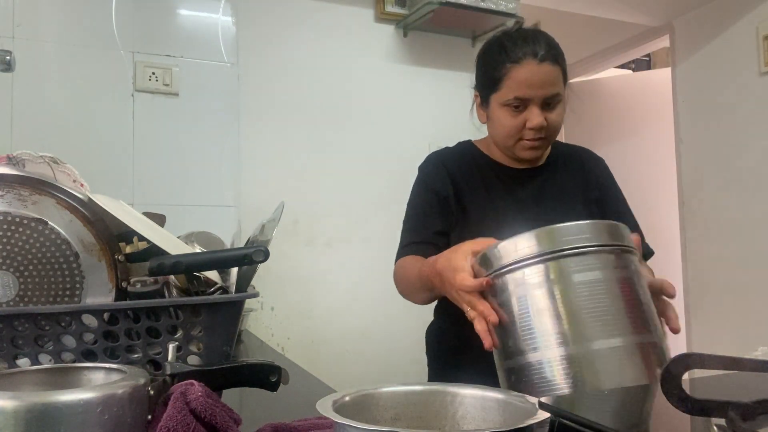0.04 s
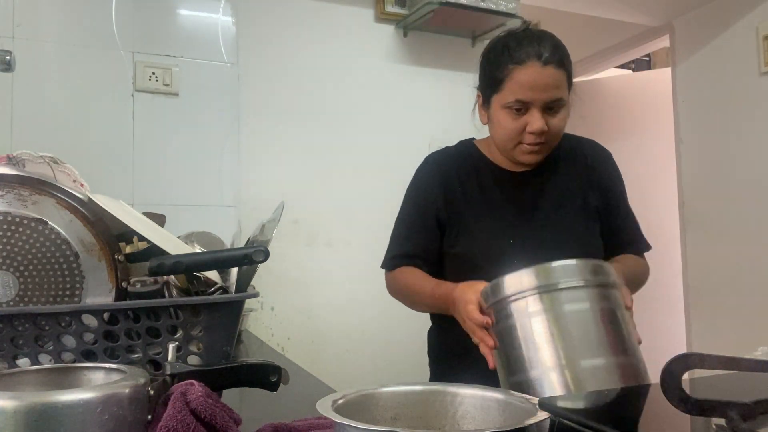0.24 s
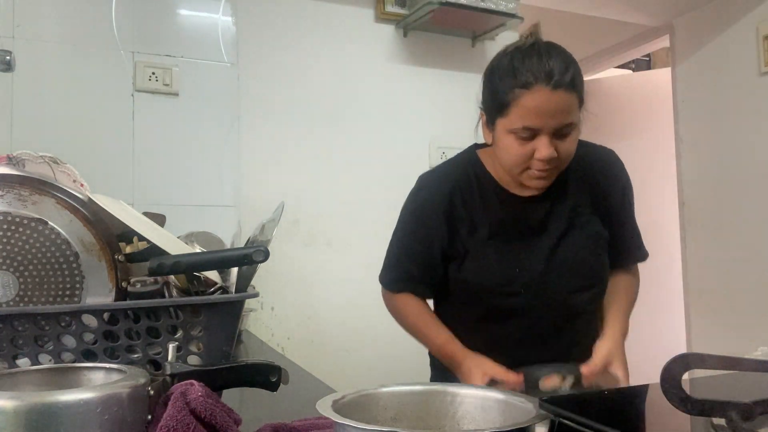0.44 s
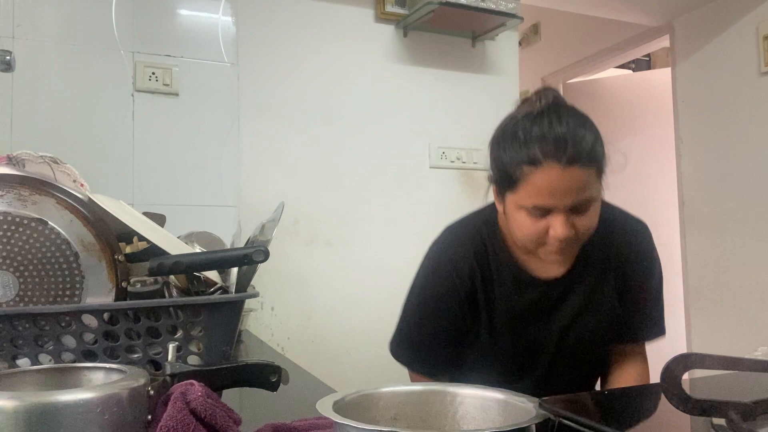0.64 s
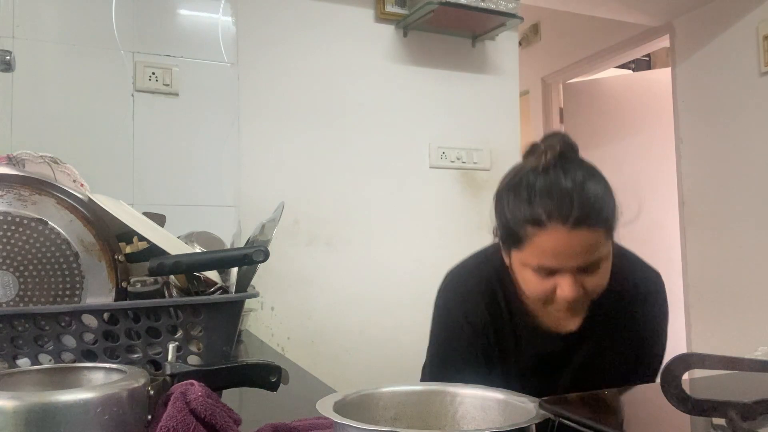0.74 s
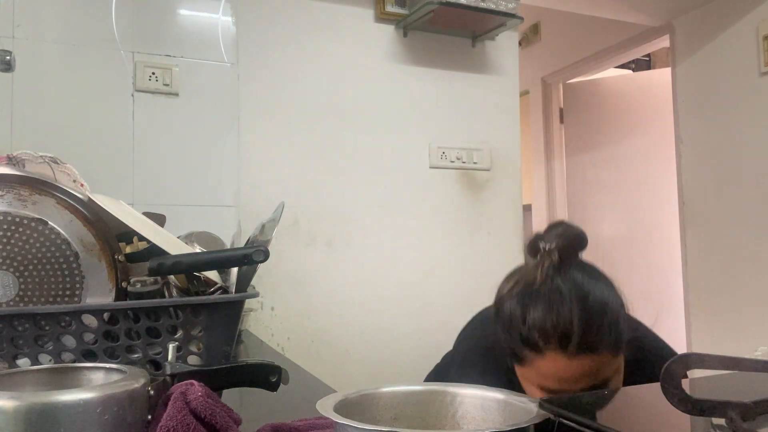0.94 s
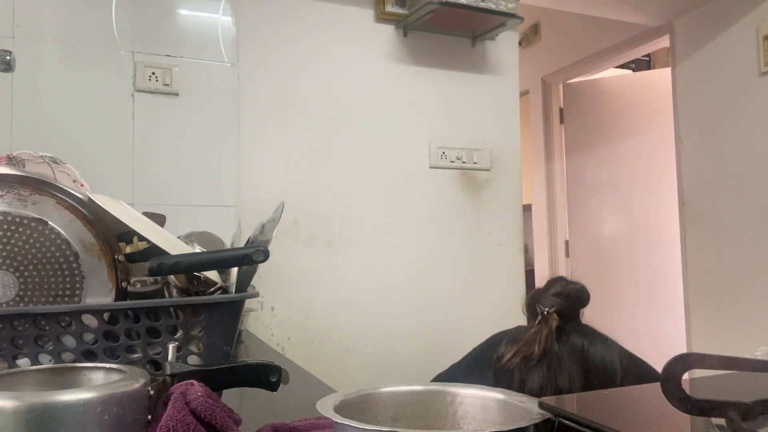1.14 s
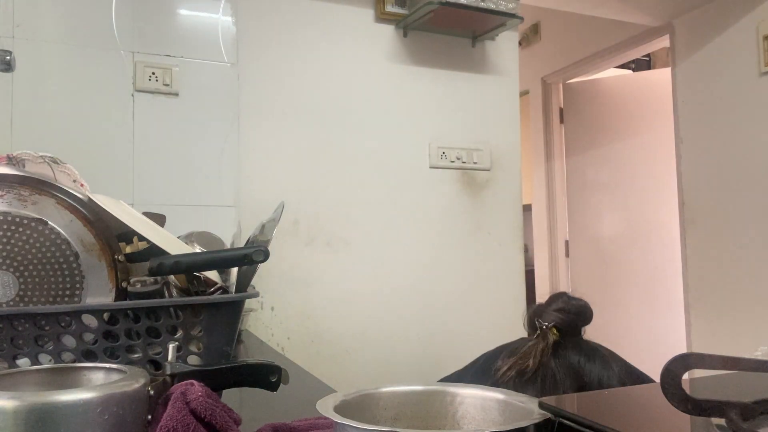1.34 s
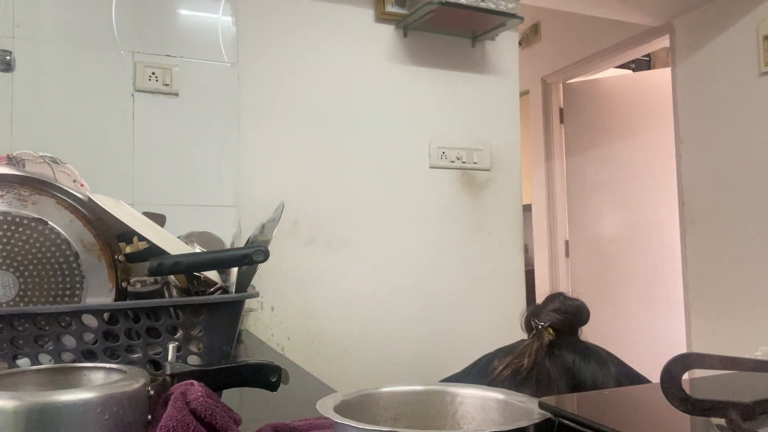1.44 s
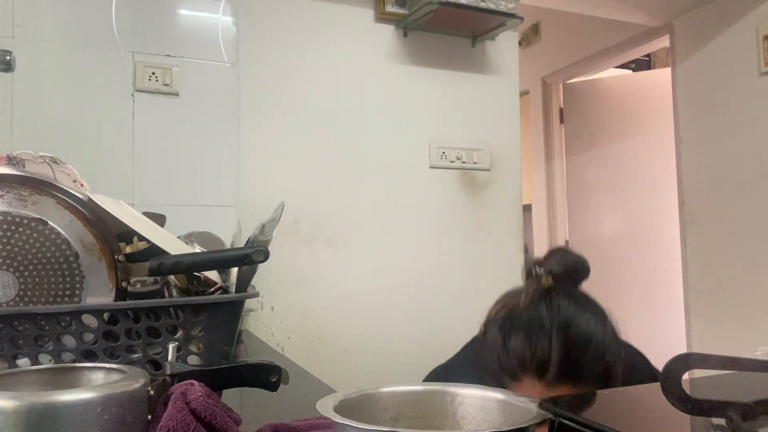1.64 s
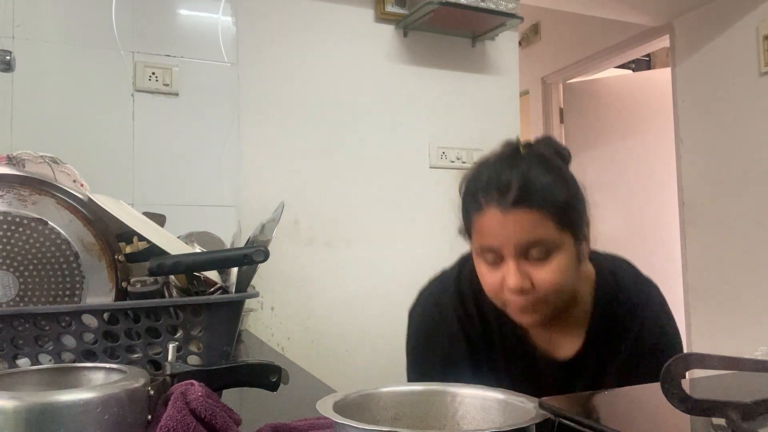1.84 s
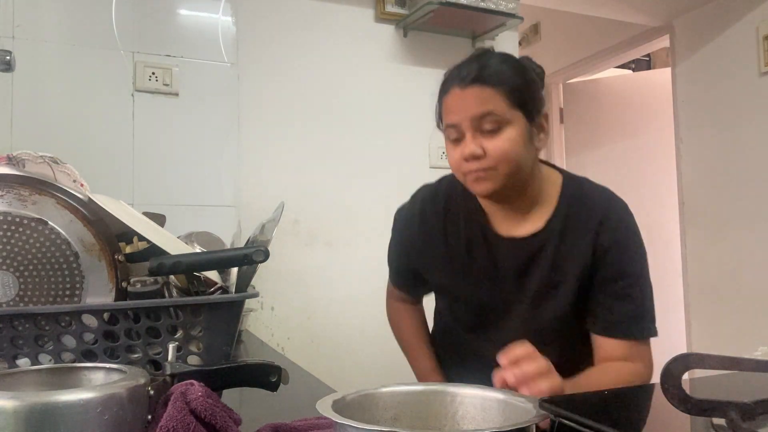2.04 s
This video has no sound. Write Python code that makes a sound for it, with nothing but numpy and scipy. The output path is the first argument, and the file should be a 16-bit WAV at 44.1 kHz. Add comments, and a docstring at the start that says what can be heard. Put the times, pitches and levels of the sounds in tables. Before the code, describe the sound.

Hollow lid bumps and soft sliding on a big steel tin, then a heavy boom with clattering metal, a brief scrape and two separate dull knocks, heard through room reflections at some distance from the microphone.

```python
"""Hollow bumps as a lid is pressed onto a large steel storage tin, over soft sliding, in a hard-walled kitchen.
The tin is then set down with a boom and a clatter of loose steel, and two more hollow knocks follow below
the counter. Bumps and boom are low decaying sine modes, struck steel is higher wavering modes, and clacks,
clanks, sliding and background are coloured noise. Nearly all of the sound arrives by way of the room."""
import sys
import numpy as np
from scipy import signal
from scipy.fft import irfft
from scipy.io import wavfile
from scipy.ndimage import uniform_filter1d

SR = 44100
rng = np.random.default_rng(int(sys.argv[2]) if len(sys.argv) > 2 else 0)


def pcm_store(signal):
    """Save signal as 16-bit PCM."""
    levels = np.round(np.clip(np.atleast_2d(signal), -1, 1) * 32767)
    wavfile.write(sys.argv[1], SR, levels.astype(np.int16).T)


N = 92610
T = np.arange(N) / SR
HZ = np.fft.rfftfreq(N, 1 / SR)

# how alike left and right are: (frequency [Hz], shared part [0 to 1])
LIKENESS = [(150, 1), (320, 0.84), (500, 0.26), (750, 0.35), (1500, 0.1), (5500, 0.13), (7800, 1)]
# how far the left lags the right: (frequency [Hz], phase [rad])
LEFT_LAG = [(60, -0.01), (350, 0.68), (700, 2.5), (6000, -1.7), (8200, 0.59), (10500, 2.5), (13300, 8),
            (15000, 8)]
# modes of each steel part, by part name: (frequency [Hz], relative level [dB])
STEEL_MODES = { "top": [(445, -16), (565, 0), (667, 5.5), (963, -4.5), (1577, -4)], "wall": [(538, 5.5),
               (719, -5), (904, -1.5), (1055, 3.5), (1260, -5), (1345, -5), (2761, -15), (4547, -2),
               (5571, -10)], "lid": [(2320, 6.5), (3284, -3.5), (3940, -2), (6730, -2), (7200, -0.5),
               (8420, 1.5)], "base": [(544, 2), (730, -2), (795, 1), (990, -3), (1100, -9.5),
               (2420, -11.5)], "pot": [(533, 3), (1023, -1), (1281, -2), (2562, -8)], "rim": [(657, 5),
               (1136, -2), (1486, -8.5), (1970, -5.5), (2660, -9)], "flank": [(452, 2), (538, 1.5),
               (678, -1), (1410, -7), (1669, -13)]}

BODY_SCATTER, SCATTER_HZ = 0.25, 55  # waver depth of low modes (ratio), waver rate of every mode (Hz)


def amp(db):
    """Decibels to gain."""
    return 10 ** (np.asarray(db) / 20)


def unit(x):
    """Scales to rms 1."""
    return x / np.sqrt(np.mean(x ** 2) + 1e-20)


def read(points, hz):
    """Reads a table on a log-frequency axis."""
    f, value = np.transpose(points)
    return np.interp(np.log(hz + 1), np.log(f), value)


def add(mix, s, sound):
    """Mixes a stereo sound in at time s."""
    part = mix[:, max(round(s * SR), 0):]
    part += sound[:, :part.shape[1]]


def dying(t, t60):
    """Exponential decay, 60 dB in t60."""
    return np.exp(-np.log(1000) * t / t60)


def at_left(right, other, hz):
    """Left signal: the part shared with the right plus an unrelated part."""
    same = np.clip(read(LIKENESS, hz), 0, 1)
    return same * right + np.sqrt(1 - same ** 2) * other


def left_delay(hz):
    """Phase turn by which the left lags the right."""
    return np.exp(-1j * read(LEFT_LAG, hz))


def diffuse(colour_db, tilt_db=0):
    """Coloured stereo noise at rms 1, left and right partly alike by frequency."""
    right, other = np.exp(2j * np.pi * rng.random((2, len(HZ))))
    left = at_left(right, other, HZ) * left_delay(HZ)
    octaves = np.log2(np.maximum(HZ, 500) / 500)  # the tilt acts above 500 Hz only
    return unit(irfft(np.array([left, right]) * amp(colour_db + tilt_db * octaves), N))


def ripple():
    """Fine, irregular spectral peaks and dips of sheet steel's countless weaker modes, in dB."""
    depth_db, spacing_hz = 3.5, 44.75
    knots = rng.standard_normal(4096)
    return depth_db * np.interp(HZ / spacing_hz, np.arange(len(knots)), knots)


def resonances(modes):
    """Spectrum in dB of a set of narrow steel resonances that widen with frequency."""
    width_hz, width_share = 21, 0.011
    power = 1e-12
    for hz, db in modes:
        detune = (HZ - hz) / (width_hz + width_share * hz)
        power = power + amp(db) ** 2 / (1 + detune ** 2) ** 2
    return 10 * np.log10(power)


def onset():
    """A weak direct sound, then the quick build-up of reflections."""
    direct_db, build_s = -8, 0.008
    return 1 - (1 - amp(direct_db)) * np.exp(-T / build_s)


def burst(colour_db, tilt_db, t60s, tail_db):
    """A blow smeared by the room: quick swell, decay by band, then a weaker, slower tail."""
    tail_stretch = 2.1  # the tail's t60 relative to the main decay
    hz, t, z = signal.stft(diffuse(colour_db, tilt_db), SR, nperseg=256)
    fall_db = -60 * t / read(t60s, hz)[:, None]
    z = z * np.hypot(amp(fall_db), amp(tail_db + fall_db / tail_stretch))
    return signal.istft(z, SR, nperseg=256)[1][:, :N] * onset()


def mode(hz, scatter):
    """One ringing mode in stereo, wavering as its reflections overlap."""
    knots = rng.standard_normal((2, 512, 2)) @ [1, 1j] / np.sqrt(2)
    right, other = (np.interp(T * SCATTER_HZ, np.arange(len(k)), k) for k in knots)
    left_waver = (1 + scatter * at_left(right, other, hz)) * left_delay(hz)
    waver = np.array([left_waver, 1 + scatter * right])
    return (waver * np.exp(2j * np.pi * hz * T)).imag / np.hypot(1, scatter)


def bumps(events, modes):
    """Each bump swells a hollow body's low modes and adds a short noisy clack."""
    # spectrum of the clack: (frequency [Hz], relative level [dB per Hz])
    clack_points = [(40, -36), (130, 0), (330, 2.5), (480, -3), (680, -1), (950, -8.5), (1900, -13.5),
                    (3800, -24.5), (6000, -26.5), (8200, -23), (10000, -35), (15000, -34.5)]
    # decay of the clack: (frequency [Hz], t60 [s])
    clack_t60s = [(150, 0.86), (700, 0.46), (2500, 0.67), (8000, 0.43), (15000, 0.37)]
    rise_s, clack_tail_db = 0.0081, -26
    tail_db, tail_t60 = -29.5, 1.48  # the body's faint lingering in the room (dB, s)
    pan = amp([[-0.76], [0.76]])  # body leans right (dB at left, right)

    out = np.zeros((2, N))
    swell = 1 - np.exp(-(T / rise_s) ** 2)
    tail = amp(tail_db) * dying(T, tail_t60)
    colour = read(clack_points, HZ) + ripple()
    for s, body_db, pitch, clack_db, tilt_db in events:
        body = np.zeros((2, N))
        for hz, db, t60 in modes:
            body += amp(db) * mode(hz * pitch, BODY_SCATTER) * (dying(T, t60) + tail)
        clack = burst(colour, tilt_db, clack_t60s, clack_tail_db)
        add(out, s, 2 * amp(body_db) * swell * body * pan + amp(clack_db) * clack)
    return out


def room_background():
    """Steady low room noise, strongest around 60 to 105 Hz."""
    # spectrum of the background: (frequency [Hz], relative level [dB per Hz])
    air_points = [(20, -34), (42, -6.5), (62, 4.5), (80, -4), (105, 6.5), (200, -5.5), (300, -7.5),
                  (500, -13.5), (1000, -19.5), (2500, -31.5), (5000, -65)]
    level_db = -41.5
    return amp(level_db) * diffuse(read(air_points, HZ))


def rubbing():
    """Hands and steel slide over steel: a grainy rasp, a thin hiss, and the tin's ringing scrape."""
    # sliding and rubbing: (time [s], rasp level [dB], hiss level [dB])
    rub_levels = [(0, -55.5, -58.5), (.1, -53.5, -56.5), (.17, -50.5, -51), (.23, -49, -47),
                  (.32, -80, -94), (.38, -61, -61.5), (.44, -59, -54.5), (.5, -46.5, -56), (.9, -46.5, -59),
                  (1.15, -57.5, -87), (1.42, -61.5, -66.5), (1.58, -58.5, -60), (1.8, -61, -69),
                  (1.92, -49, -64.5), (2.03, -54.5, -59.5), (2.1, -63, -72.5)]
    # spectrum of the rasp: (frequency [Hz], relative level [dB per Hz])
    rasp_points = [(200, 4), (700, -6), (1400, 3), (2600, 3.5), (4200, 0.5), (6500, -7.5), (15000, -22.5)]
    # spectrum of the hiss: (frequency [Hz], relative level [dB per Hz])
    hiss_points = [(1000, -43), (4000, -10.5), (8200, -2), (10000, -9.5), (15000, -7.5)]
    # the tin's base scrapes along as it is pushed into place: (time [s], level [dB])
    scrape_levels = [(.7, -78), (.77, -39), (.83, -44), (.91, -41), (.96, -47), (1.035, -45.5), (1.1, -61)]
    grain_db, grain_s = 1.5, 0.0013  # rms level flutter, smoothing time

    flutter = unit(uniform_filter1d(rng.standard_normal(N), int(grain_s * SR)))
    grain = unit(amp(grain_db * flutter))
    s, rasp_db, hiss_db = np.transpose(rub_levels)
    rasp = amp(np.interp(T, s, rasp_db)) * diffuse(read(rasp_points, HZ) + ripple())
    hiss = amp(np.interp(T, s, hiss_db)) * diffuse(read(hiss_points, HZ) + ripple())
    # silent before and after the scrape
    scrape_db = np.interp(T, *np.transpose(scrape_levels), left=-np.inf, right=-np.inf)
    scrape = amp(scrape_db) * diffuse(resonances(STEEL_MODES["base"]))
    return grain * (rasp + hiss + scrape)


def lid_presses():
    """Pressing the lid on bumps the lid's low modes over the closed tin."""
    # bumps: (time [s], relative body level [dB], pitch [ratio], clack level [dB],
    #         clack brightness [dB per octave])
    presses = [(.002, -33, 0.78, -39, -2), (.066, -28, 0.94, -48, 0), (.093, -25.5, 0.96, -50, 2),
               (.119, -28, 0.86, -37, -2.5), (.193, -19, 0.94, -34.5, -1), (.213, -19, 0.98, -40, 1.5),
               (.328, -36, 0.91, -69, 4)]
    # modes of the lid over the tin, before the pitch ratio: (frequency [Hz], relative level [dB], t60 [s])
    lid_modes = [(142.7, -15, 0.29), (171.5, -15, 0.31), (202.5, 0.5, 0.15), (265.1, -1, 0.22),
                 (351, -19.5, 0.33), (450, -20.5, 0.2)]
    return bumps(presses, lid_modes)


def rings():
    """Struck steel parts swell quickly and die away, their high modes first."""
    # parts set ringing: (time [s], level of the whole part [dB], t60 at 1 kHz [s], part [name])
    ring_events = [(.195, -32, 0.47, "top"), (.487, -25.5, 0.58, "wall"), (.528, -25.5, 0.66, "wall"),
                   (.637, -28, 0.4, "lid"), (.7, -36, 0.46, "lid"), (.854, -28, 0.13, "base"),
                   (1.222, -44.5, 0.99, "pot"), (1.282, -28, 0.27, "rim"), (1.638, -26, 0.25, "flank")]
    rise_s, scatter = 0.0051, 0.89
    damping = 0.21  # t60 falls with this power of frequency

    out = np.zeros((2, N))
    swell = 1 - np.exp(-T / rise_s)
    for s, db, t60, part in ring_events:
        size = np.sqrt(sum(amp(mode_db) ** 2 for hz, mode_db in STEEL_MODES[part]) / 2)
        for hz, mode_db in STEEL_MODES[part]:
            decay = dying(T, t60 / (hz / 1000) ** damping)
            add(out, s, amp(db + mode_db) / size * swell * decay * mode(hz, scatter))
    return out


def clanks():
    """Steel striking steel and floor: each contact gives a bright crash of dense modes."""
    # contacts: (time [s], level [dB], brightness [dB per octave])
    contacts = [(.485, -19, -3.5), (.496, -18, -2.35), (.505, -24.5, 2), (.528, -19, 0.44),
                (.555, -21.5, 0), (.596, -28, .5), (.635, -23, 4), (.655, -31.5, 1), (.857, -37.5, -4.5),
                (1.99, -51.5, 3)]
    # spectrum of the crash: (frequency [Hz], relative level [dB per Hz])
    crash_points = [(25, -31), (120, 12.5), (330, 6.5), (560, 6), (850, -1), (1150, 0), (2000, -2.5),
                    (5200, 0), (6100, -5.5), (7600, -5.5), (9500, -8), (13200, -11), (15500, -14.5)]
    # decay of the crash: (frequency [Hz], t60 [s])
    crash_t60s = [(100, 0.39), (600, 0.62), (2500, 0.72), (5000, 0.34), (8000, 0.44), (15000, 0.25)]
    tail_db = -27

    out = np.zeros((2, N))
    colour = read(crash_points, HZ) + ripple()
    for s, db, tilt_db in contacts:
        add(out, s, amp(db) * burst(colour, tilt_db, crash_t60s, tail_db))
    return out


def boom():
    """As the tin lands, its base's low modes build up, hold and die, and linger faintly in the room."""
    # modes of the base: (frequency [Hz], level [dB], attack [s], hold [s], t60 [s])
    base_modes = [(63.6, -10, 0.061, 0.085, 0.26), (132.6, -16, 0.055, 0.016, 0.43),
                  (191.7, -16, 0.0071, 0.013, 0.24), (259.3, -23.5, 0.0089, 0.049, 0.34),
                  (350.3, -20.5, 0.018, 0.018, 0.4)]
    landing_s, tail_db, tail_t60 = 0.487, -15.5, 1.38

    out = np.zeros((2, N))
    for hz, db, attack, hold, t60 in base_modes:
        swell = np.sin(np.pi / 2 * np.minimum(T / attack, 1)) ** 2
        after = np.maximum(T - attack - hold, 0)
        release = np.maximum(dying(after, t60), amp(tail_db) * dying(after, tail_t60))
        add(out, landing_s, amp(db) * swell * release * mode(hz, BODY_SCATTER))
    return out


def knocks():
    """Hollow knocks below the counter excite the low modes of a hollow body."""
    # bumps: (time [s], relative body level [dB], pitch [ratio], clack level [dB],
    #         clack brightness [dB per octave])
    knock_events = [(1.279, -23, 1.1, -29.5, -2.5), (1.286, -24, 1.274, -27.5, -1),
                    (1.304, -16, 1.013, -43, -2.5), (1.586, -37.5, 0.99, -51, 0), (1.627, -24.5, 1, -34, 4),
                    (1.6405, -14, 1, -27.5, -6), (1.6556, -18.5, 1, -28, -9)]
    # modes of the hollow body, before the pitch ratio: (frequency [Hz], relative level [dB], t60 [s])
    body_modes = [(105.1, -16, 0.74), (135.5, -8, 0.21), (186.6, -15.5, 0.49), (264, 2.5, 0.22),
                  (342.7, -18, 0.32), (405, -26, 0.57)]
    return bumps(knock_events, body_modes)


def scene():
    """Background, rubbing, lid bumps, ringing steel, the landing and the last knocks."""
    handling = lid_presses() + rings() + knocks()
    landing = clanks() + boom()
    return room_background() + rubbing() + handling + landing


def record(dry):
    """The recorder's band limit: a steep linear-phase low-pass."""
    edge_hz = 15150
    low_pass = signal.firwin(511, edge_hz, window=("kaiser", 9), fs=SR)
    return signal.oaconvolve(dry, low_pass[None], "same")


dry = scene()
out = record(dry)
pcm_store(out)
```